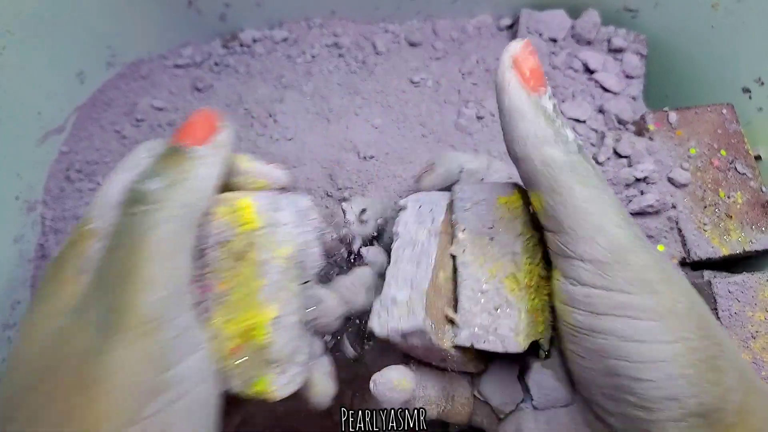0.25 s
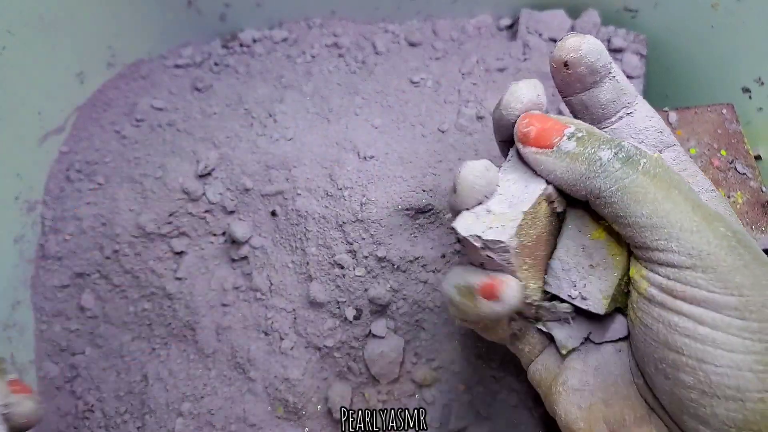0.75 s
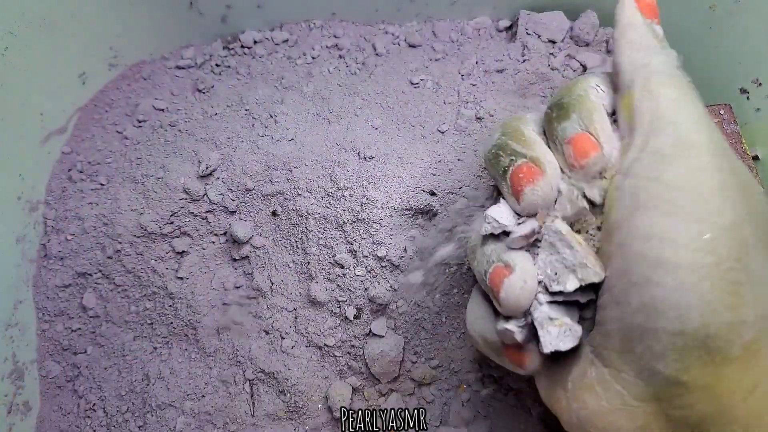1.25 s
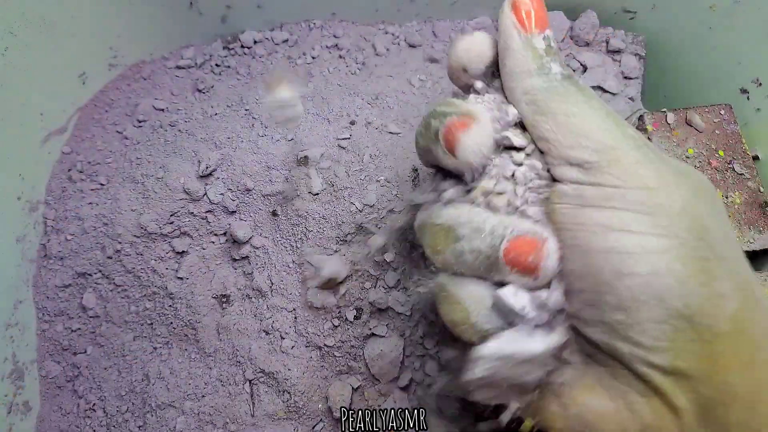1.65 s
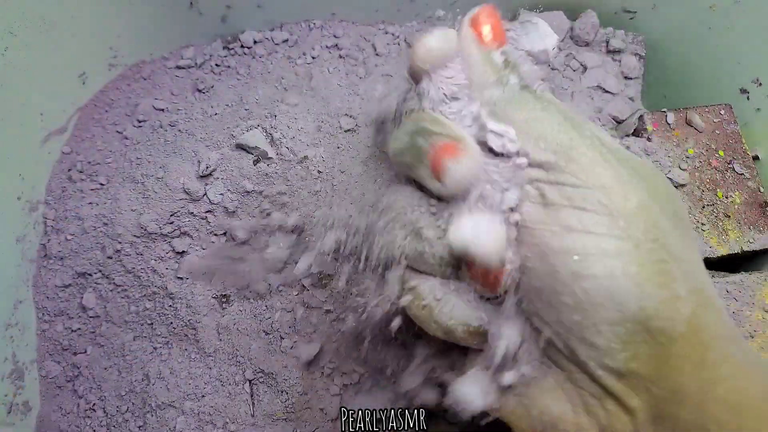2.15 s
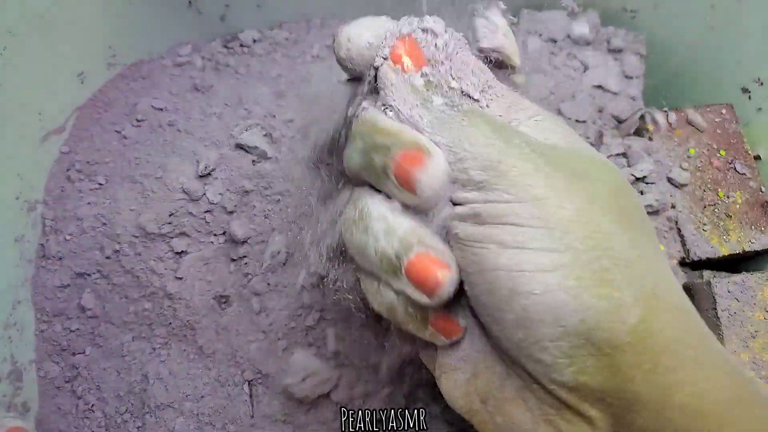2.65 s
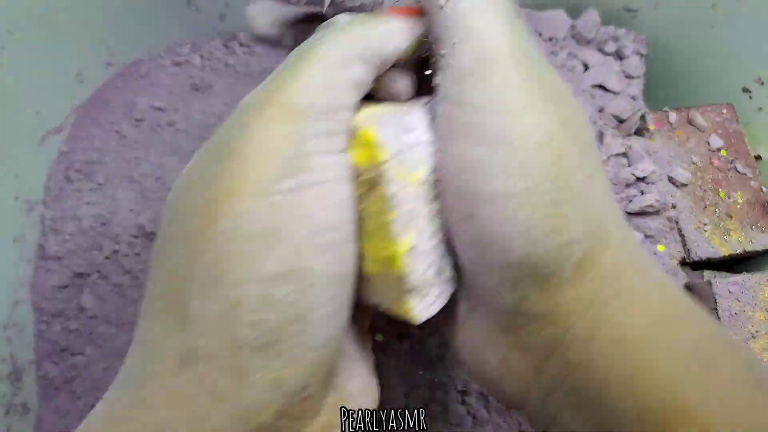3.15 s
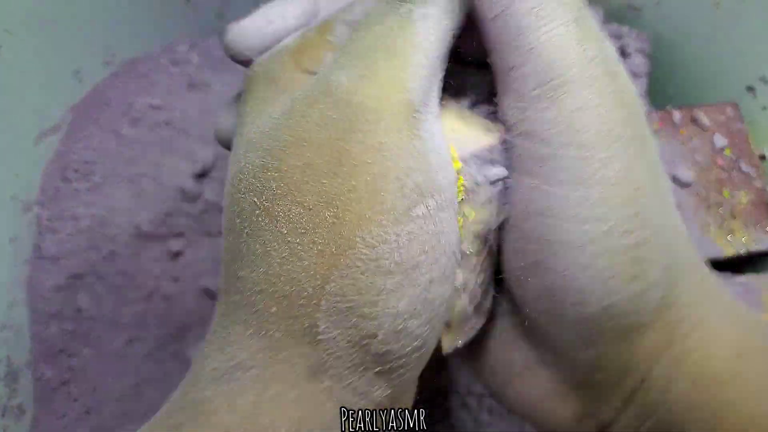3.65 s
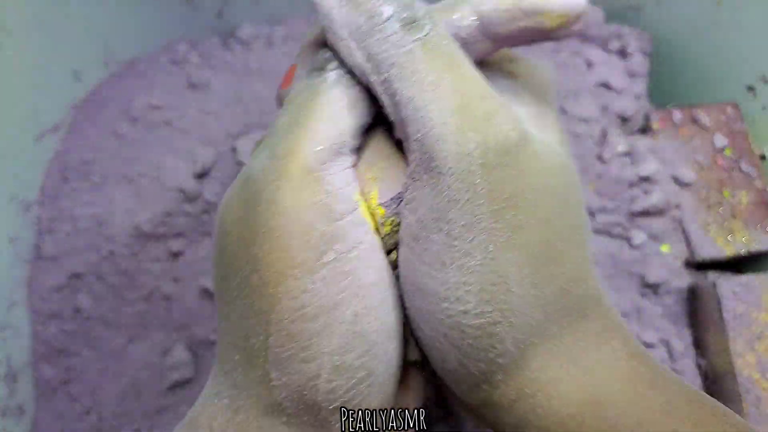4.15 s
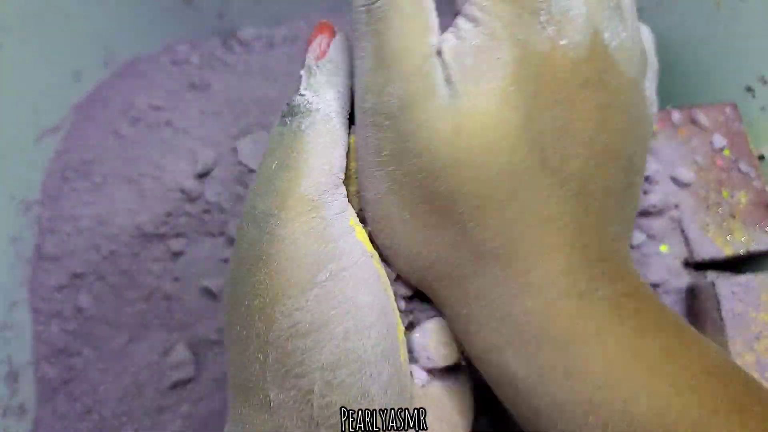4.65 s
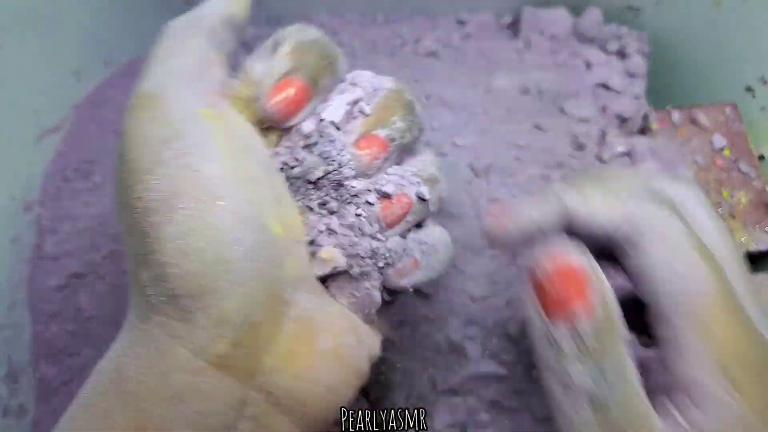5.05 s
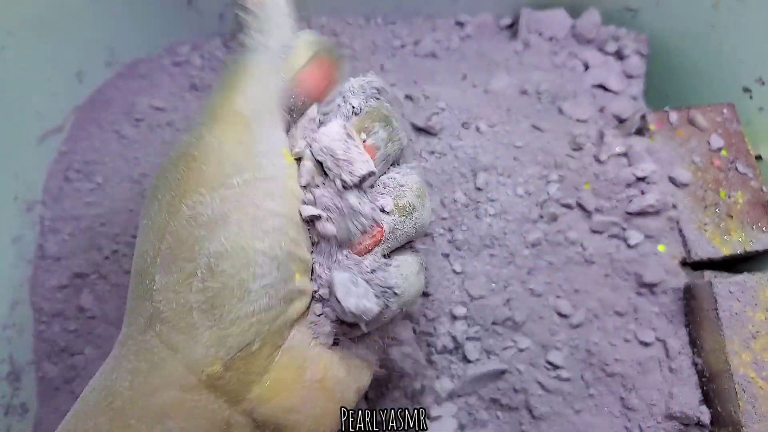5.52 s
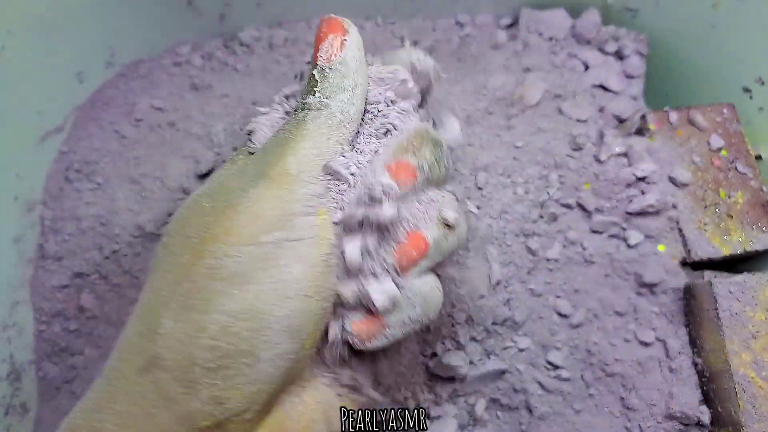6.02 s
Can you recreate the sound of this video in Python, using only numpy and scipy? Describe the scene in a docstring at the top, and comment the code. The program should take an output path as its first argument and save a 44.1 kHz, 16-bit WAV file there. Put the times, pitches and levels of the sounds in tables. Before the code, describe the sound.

Close, dry, indoor sound of hands breaking soft chalk over a plastic tub. A faint snap and grind open it, then a quiet gap, then a loud burst of brittle cracks just before one second. Crumbly squeezing and powdery hiss follow in separate grips, with lighter ticks. Another strong break comes past the middle, muffled slightly between the palms, then more crunching and sharp late snaps. Occasional low thuds sit underneath.

```python
"""A faint snap and a brief grind come first: hands squeeze soft chalk over a plastic tub, near one microphone.
Blocks break in short bursts of fractures: random impulses that excite a damped resonance and splinters.
Crumbs grind as clumped noise and small rings, powder hisses as bright noise, and both follow the grips.
The tub floor rumbles as low noise, chalk squeaks on skin in stuttering tones, and lumps thud on the tub
as decaying modes."""
import sys
import numpy as np
from scipy import signal
from scipy.fft import rfft, irfft, next_fast_len
from scipy.io import wavfile
from scipy.ndimage import map_coordinates

SR = 44100
rng = np.random.default_rng(int(sys.argv[2]) if len(sys.argv) > 2 else 0)


def wav_out(sig):
    """Save sig, one row per channel (or a flat mono array), as 16-bit PCM at SR to the path in sys.argv[1]."""
    wavfile.write(sys.argv[1], SR, np.round(np.clip(np.atleast_2d(sig).T, -1, 1) * 32767).astype(np.int16))


N = 276948  # samples in the scene


def amp(db):
    """Decibel law: a level in dB becomes an amplitude ratio."""
    return 10 ** (np.asarray(db) / 20)


def unit(x):
    """Normalisation of power: the signal is scaled to rms 1."""
    return x / np.sqrt(np.mean(x ** 2) + 1e-20)


def along(points, hz):
    """Interpolation on a logarithmic frequency axis through (f/Hz, value) points."""
    point_hz, value = np.transpose(points)
    return np.interp(np.log(hz + 1), np.log(point_hz + 1), value)


def curves(rows):
    """Linear interpolation in time: one value per sample for each column after t/s."""
    s, *columns = np.transpose(rows)
    return [np.interp(np.arange(N) / SR, s, column) for column in columns]


def wobble(rate):
    """Band-limited random modulation: a smooth curve through `rate` random knots a second."""
    knots = rng.standard_normal(int(N * rate / SR) + 4)
    return map_coordinates(knots, [np.arange(N) * rate / SR])


def filtered(x, response):
    """Linear filtering: the spectrum is multiplied by a response of frequency."""
    size = next_fast_len(N + 8192)
    spectrum = rfft(x, size) * response(np.fft.rfftfreq(size, 1 / SR))
    return irfft(spectrum, size)[..., :N]


# Fractures of the blocks: t/s, peak level/dB, piece f/Hz, splinter level/dB re body, burst t60/s
FRACTURES = [(0.0, -23.5, 2100, -15, 0.21), (0.4, -20, 7750, -5, 0.0044), (0.5, -26, 6240, 3, 0.025),
             (0.71, -16.5, 3500, 1, 0.015), (0.882, 4.5, 720, 7, 0.027), (0.898, -3, 2740, -9, 0.02),
             (1.005, -3.5, 3320, -3, 0.036), (1.061, -3, 6100, -5, 0.018), (1.137, -16.5, 790, -16, 0.028),
             (1.164, -5, 780, 2, 0.02), (1.185, -9, 1530, -19, 0.014), (1.193, -3.5, 2210, -35, 0.039),
             (1.28, -5, 2430, -31, 0.011), (1.311, -18.5, 615, 0, 0.027), (1.654, -8.5, 950, -21, 0.016),
             (1.715, -17, 6040, 4, 0.02), (1.726, -13, 3700, 1, 0.031), (1.79, -10, 4500, -11, 0.025),
             (1.846, -12, 1150, -17, 0.029), (2.592, -9.5, 1430, -7, 0.022), (3.172, -24, 6000, 5, 0.038),
             (3.328, -7.5, 3370, -17, 0.03), (3.68, -6, 1100, -4.5, 0.043), (3.713, -2.5, 1940, -7, 0.022),
             (4.082, -15.5, 468, -22, 0.018), (4.132, -10.5, 1230, -13, 0.023),
             (4.528, -19.5, 895, -14, 0.044), (4.635, -18, 1900, -8, 0.048), (4.679, -13, 1270, -9, 0.043),
             (4.816, -10, 902, -3.5, 0.021), (5.034, -11, 7000, 2, 0.012), (5.11, -14, 2560, -18, 0.063),
             (5.362, -13.5, 790, -6, 0.024), (5.384, -12.5, 1160, -10, 0.017),
             (5.555, -1.5, 1020, 9.5, 0.01), (5.608, -11, 6700, -20, 0.019), (6.077, -12, 456, -0.5, 0.018),
             (6.153, -6.5, 2440, -15, 0.016), (6.161, -2.5, 1140, 5.5, 0.03),
             (6.198, -10.5, 1130, -5, 0.026), (6.259, -7.5, 1910, -15, 0.047)]
# Further fracture bursts of small pieces, sharing one splinter level and burst t60: t/s, peak level/dB, piece
# f/Hz
SMALL_FRACTURES = [(0.134, -31, 2000), (0.67, -30, 8100), (0.808, -28, 4200), (0.961, -6, 2800),
                   (1.04, -13, 3380), (1.055, -12, 3040), (1.085, -9.5, 3040), (1.106, -11.5, 3000),
                   (1.299, -8.5, 2720), (1.475, -26.5, 3000), (1.523, -14, 3420), (1.587, -24, 1500),
                   (1.598, -25, 1190), (1.612, -25, 1800), (1.646, -25, 4000), (1.669, -10.5, 1530),
                   (1.927, -28, 2000), (2.054, -16.5, 3830), (2.208, -15.5, 3230), (2.232, -18.5, 3500),
                   (2.47, -25.5, 2480), (2.526, -21.5, 3500), (2.672, -22, 3540), (2.746, -27, 2500),
                   (2.78, -18, 2980), (2.811, -21, 1500), (2.906, -26, 2500), (3.69, -4, 2500), (3.706, -3, 2200),
                   (3.73, -7, 2000), (3.835, -20.5, 980), (4.096, -8.5, 2950), (4.211, -13.5, 1850),
                   (4.698, -17, 3050), (4.757, -14, 4140), (4.772, -25, 2000), (4.801, -14, 1500),
                   (4.832, -9, 3900), (4.863, -20, 2040), (4.91, -8.5, 1670), (5.084, -18.5, 2590),
                   (5.32, -14.5, 1100), (5.337, -18, 1000), (5.605, -9, 3560), (6.098, -5.5, 3450),
                   (6.115, -11, 3920)]
SMALL_SPLINTER_DB, SMALL_T60_S = -10.5, 0.011


def snaps():
    """Brittle fracture: a crack spreads, breaks and runs on; the piece resonates briefly and splinters tick."""
    out, t = np.zeros(N + SR), np.arange(SR // 8) / SR
    splinter_band = signal.butter(2, [2600, 9000], "band", fs=SR)
    spread_s = 0.0018  # from the first give to the main break
    ticks = [(*tick, SMALL_SPLINTER_DB, SMALL_T60_S) for tick in SMALL_FRACTURES]
    for s, db, hz, splinter_db, t60 in [*FRACTURES, *ticks]:
        chance, sign, fizz = rng.random(len(t)), rng.standard_normal(len(t)), rng.standard_normal(len(t))
        shape = amp(-60 * t / max(t60, 0.003)) * (1 - np.exp(-(t / spread_s) ** 2))
        breaks = ((chance < 2500 / SR) * sign + 0.28 * fizz) * shape
        breaks[round(spread_s * SR)] += 1.04 * np.sign(sign[0])  # the main break

        ring = signal.iirpeak(hz, 2.2, SR)
        piece = signal.lfilter(*ring, signal.lfilter(*ring, breaks))
        broad_band = signal.butter(2, [hz / 3.77, hz * 0.74 + 2500], "band", fs=SR)
        broad = signal.lfilter(*broad_band, breaks)
        body = piece / np.abs(piece).max() + amp(6.0) * broad / np.abs(broad).max()

        splinter = signal.lfilter(*splinter_band, breaks)
        burst = body / np.abs(body).max() + amp(splinter_db) * splinter / np.abs(splinter).max()
        out[round(s * SR):][:len(t)] += amp(db) * burst / np.abs(burst).max()
    return out[:N]


# Decay of the tub walls' answer: f/Hz, t60/s
WALL_DECAY = [(200, 0.019), (2000, 0.35), (12000, 0.23)]


def walls(x):
    """Reverberation: the walls answer with noise that decays at its own rate in each frequency band."""
    hz, t, bands = signal.stft(rng.standard_normal(SR // 6), SR, nperseg=128)
    decay = amp(-60 * t / along(WALL_DECAY, hz)[:, None])
    tail = signal.istft(bands * decay, SR, nperseg=128)[1]
    delayed = np.pad(x, (40, 0))  # samples
    return signal.fftconvolve(delayed, tail / np.linalg.norm(tail))[:N]


def grit(spectrum, per_s, spread_db, bed_db, clump_db):
    """Granular noise: clumped random ticks of uneven size lie on a noise bed, coloured by a spectrum."""
    chance, size, sign = rng.random(N), rng.exponential(size=N), rng.standard_normal(N)
    ticks = unit((chance < per_s / SR) * sign * amp(spread_db * np.minimum(size, 4)))
    clumps = amp(clump_db * (wobble(22) + wobble(90)))
    mix = clumps * (ticks + amp(bed_db) * rng.standard_normal(N))
    return unit(filtered(mix, lambda hz: amp(along(spectrum, hz))))


def fragments(count, centre_hz, octaves, cycles, spread_db):
    """Damped free vibration: each small break rings at a pitch drawn at random about a centre."""
    when, pitch = rng.random(count), rng.standard_normal(count)
    size, phase = rng.exponential(size=count), rng.random(count)
    hz = np.clip(centre_hz * 2 ** (octaves * pitch), 250, 12000)[:, None]
    turns = hz * np.arange(320) / SR
    rings = np.sin(2 * np.pi * (turns + phase[:, None]))
    rings *= np.exp(-turns / cycles) * np.minimum(turns * 4, 1)  # onset lasts a quarter cycle
    rings *= amp(spread_db * np.minimum(size, 4))[:, None]
    where = (when * N).astype(int)[:, None] + np.arange(320)
    return unit(np.bincount(where.ravel(), rings.ravel(), minlength=N)[:N])


# Squeezes and rubs of the hands: full pressure t/s, held/s, crumb level/dB, powder level/dB
GRIP_TIMES = [(0.0, 0.0037, -36.5, -42), (0.224, 0.028, -48.5, -39), (0.413, 0.006, -49.5, -40),
              (0.708, 0.005, -50, -45), (0.882, 0.025, -29.5, -32.5), (1.125, 0.044, -31.5, -36),
              (1.189, 0.003, -25, -39), (1.278, 0.026, -33.5, -39), (1.426, 0.0078, -39, -30.5),
              (1.539, 0.058, -38.5, -46), (1.661, 0.11, -35, -44.5), (1.779, 0.082, -46.5, -47.5),
              (1.951, 0.04, -39, -40), (2.089, 0.2, -36.5, -43), (2.403, 0.005, -41, -40.5),
              (2.556, 0.25, -37, -45), (3.2, 0.073, -50.5, -43), (3.33, 0.017, -39.5, -31.5),
              (3.489, 0.03, -41.5, -37), (3.681, 0.063, -30, -34.5), (3.987, 0.0088, -39, -39.5),
              (4.09, 0.063, -33.5, -44), (4.427, 0.024, -67, -34), (4.456, .005, -65, -28.5),
              (4.482, 0.15, -35.5, -38), (4.753, 0.047, -36.5, -42), (4.812, 0.052, -31.5, -36),
              (5.094, 0.008, -36, -41.5), (5.272, 0.21, -34.5, -43), (5.502, 0.11, -36, -42.5),
              (5.79, 0.02, -41.5, -41.5), (5.886, 0.17, -39.5, -43.5), (6.08, 0.024, -33.5, -42),
              (6.157, 0.0078, -29.5, -47)]
# Faint trickle between grips: t/s, crumb level/dB, powder level/dB
TRICKLE = [(0, -48, -59), (.6, -69.5, -59.5), (1.0, -47.5, -45), (1.4, -51, -54), (2.4, -47, -48.5),
           (3.1, -46, -45.5), (3.5, -53.5, -51.5), (3.9, -53, -56.5), (4.3, -45, -45), (6.28, -54, -54.5)]
# (crumbs, powder); the base rise is steepened by a factor of 1.5 or more
BASE_RISE_DB_PER_S, SAG_DB_PER_S, FALL_DB_PER_S = (259, 312), (5.5, 10), (180, 296)
# a grip whose crumbs exceed this level starts faster: the factor grows by this much per dB
SUDDEN_OVER_DB, SUDDEN_PER_DB = -36, 0.5


def pressure():
    """Power addition: grips that rise, sag while held and fall away sum with a trickle, for each material."""
    s, held, *peaks_db = np.array(GRIP_TIMES).T[..., None]
    t = np.arange(0, N, 64) / SR  # coarse time grid
    sudden = 1.5 + SUDDEN_PER_DB * np.maximum(peaks_db[0] - SUDDEN_OVER_DB, 0)
    materials = zip(peaks_db, curves(TRICKLE), BASE_RISE_DB_PER_S, SAG_DB_PER_S, FALL_DB_PER_S)
    levels = []
    for peak_db, rest_db, rise, sag, fall in materials:
        grip_db = peak_db - rise * sudden * np.maximum(s - t, 0)
        grip_db = grip_db - sag * np.clip(t - s, 0, held)
        grip_db = grip_db - fall * np.maximum(t - s - held, 0)
        power = np.interp(np.arange(N) / SR, t, np.sum(amp(2 * grip_db), axis=0))
        levels.append(10 * np.log10(power + amp(2 * rest_db)))
    return levels


# Both palms close round the block: from t/s, to t/s
PALMS_CLOSED = (3.6, 4.92)
# Resonances of the air between the palms: f/Hz, width/Hz, level/dB
PALM_AIR = [(1020, 150, 2.5), (2010, 330, -2.5)]


def hollow(x):
    """Cavity resonance: air between the palms passes bands about its natural frequencies."""
    def response(f):
        return sum(amp(db) * 1j * f * width / (centre ** 2 - f ** 2 + 1j * f * width)
                   for centre, width, db in PALM_AIR)
    t = np.arange(N) / SR
    closed = x * ((t > PALMS_CLOSED[0]) & (t < PALMS_CLOSED[1]))
    return filtered(closed, response)


# Relative spectral densities of grinding crumbs and of rubbed powder: f/Hz, level/dB per Hz
CRUMB_SPECTRUM = [(90, -36), (300, 1), (1100, -7), (2500, -7.5), (5000, -13.5), (9000, -27), (16000, -35)]
POWDER_SPECTRUM = [(1500, -81), (3000, -12), (7400, -7.5), (10000, -17), (16000, -17.5)]


def hands():
    """Friction noise: crumbs crack more when pressed harder; powder is brighter where it outweighs them."""
    crumb_db, powder_db = pressure()
    grind = grit(CRUMB_SPECTRUM, per_s=1800, spread_db=1.0, bed_db=-4, clump_db=2.6)
    cracks = fragments(count=2200, centre_hz=1900, octaves=0.8, cycles=1.2, spread_db=4.5)
    crack_gain = amp(0.47 * (crumb_db + 43.5) - 7.5)
    crumbs = amp(crumb_db) * (grind + crack_gain * cracks)
    crumbs = crumbs + hollow(crumbs)

    powder = grit(POWDER_SPECTRUM, per_s=2600, spread_db=1, bed_db=4, clump_db=2.1)
    treble = filtered(powder, lambda hz: 1 / (1 + (8500 / (hz + 1)) ** 6))
    spray_gain = amp(0.9 * np.minimum(powder_db - crumb_db, 14) - 3.5)
    return crumbs + amp(powder_db) * (powder + spray_gain * treble)


# Relative spectra of the tub floor's deep and upper rumble, one list each: f/Hz, level/dB per Hz
FLOOR_SPECTRA = [
    [(20, -49), (45, -7), (62, 5.5), (90, -7.5), (200, -80)],
    [(50, -15), (95, 1.5), (165, -3.5), (300, -17.5), (900, -73)],
]
# Strength of the floor's rumble: t/s, deep level/dB, upper level/dB
FLOOR_LEVELS = [(0.0, -50, -48), (0.54, -64.5, -59.5), (1.31, -64, -32.5), (1.42, -55, -50.5),
                (1.82, -37, -42.5), (2.4, -45.5, -44), (2.45, -31, -43), (2.53, -51, -50), (2.66, -46, -41),
                (3.18, -47.5, -44), (3.36, -36, -49), (3.46, -52, -44.5), (3.62, -46, -41.5),
                (3.73, -29, -32), (3.85, -52, -52), (4.13, -33, -40), (4.3, -55.5, -39.5), (5.88, -41, -43),
                (6.24, -52, -30.5)]


def rumble():
    """Forced vibration: falling lumps and powder shake the tub floor as uneven noise in two low regions."""
    lumps = amp(2.4 * wobble(14)) * rng.standard_normal((2, N))
    shaped = filtered(lumps, lambda hz: amp([along(region, hz) for region in FLOOR_SPECTRA]))
    return sum(amp(db) * unit(region) for db, region in zip(curves(FLOOR_LEVELS), shaped))


# Chalk squeaking on skin: start t/s, length/s, level/dB of each tone before its random stutter
SQUEAK_TIMES = [(0.21, .12, -48.5), (0.392, 0.042, -41), (1.116, .016, -29), (2.962, 0.048, -45)]
# Tones of each squeak in turn: f/Hz
SQUEAK_TONES = [(3750, 4370, 5050, 5800, 6450, 7700), (4400, 6150, 7700), (2050, 3950, 7350), (7050, 9000)]


def squeaks():
    """Stick-slip friction: a few thin tones are roughened by fast random amplitude modulation."""
    t, out = np.arange(N) / SR, np.zeros(N)
    for (s, length, db), tones_hz in zip(SQUEAK_TIMES, SQUEAK_TONES):
        shape = np.sin(np.pi * np.clip((t - s) / length, 0, 1)) ** 0.5 * amp(db)
        out += shape * sum(wobble(320) * np.sin(2 * np.pi * hz * t) for hz in tones_hz)
    return out


# Lumps landing in the tub: t/s, strike level/dB applied to the sum of modes
LUMP_STRIKES = [(0.882, -18), (1.06, -21), (2.408, -27), (2.639, -16), (3.331, -24.5), (3.683, -18),
                (3.714, -16.5), (6.077, -25), (6.157, -15.5)]
# Low modes of the tub: f/Hz, mean level/dB, t60/s
TUB_MODES = [(177.4, -1.5, 0.089), (266, -1, 0.05), (437, 1.5, 0.029)]


def thuds():
    """Modal excitation: a soft blow rings the low modes of the tub, balanced a little differently each time."""
    out, t = np.zeros(N + SR), np.arange(SR // 5) / SR
    onset = 1 - np.exp(-t / 0.0009)
    for s, db in LUMP_STRIKES:
        ring = sum(amp(level + rng.normal(0, 1) - 60 * t / t60) * np.sin(2 * np.pi * hz * t)
                   for hz, level, t60 in TUB_MODES)
        out[round(s * SR):][:len(t)] += amp(db) * ring * onset
    return out[:N]


def scene():
    """Superposition: all sources add at one microphone, which feeds both channels."""
    hits = snaps() + thuds()
    mono = hits + amp(-14.0) * walls(hits) + hands() + rumble() + squeaks()
    return np.tile(mono, (2, 1))


TOP_HZ = 15800  # band limit


def record(dry):
    """Saturation and band limiting: the loudest peaks round off and the top of the spectrum is removed."""
    ceiling = 0.97
    rounded = dry / (1 + np.abs(dry / ceiling) ** 6) ** (1 / 6)
    return filtered(rounded, lambda hz: hz < TOP_HZ)


dry = scene()
out = record(dry)
wav_out(out)
```